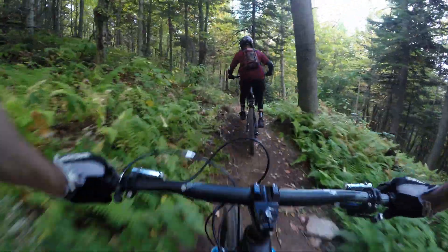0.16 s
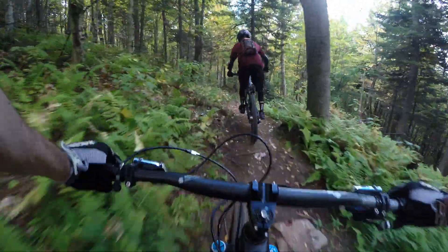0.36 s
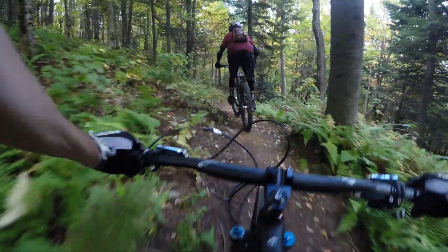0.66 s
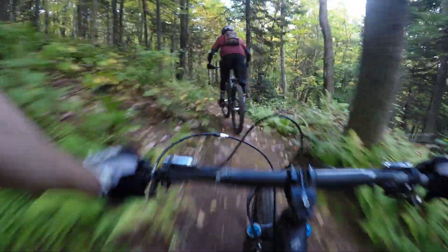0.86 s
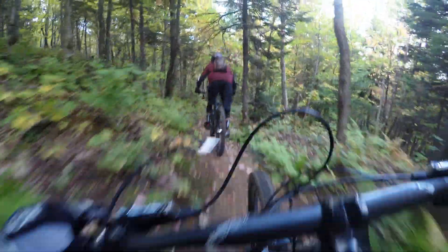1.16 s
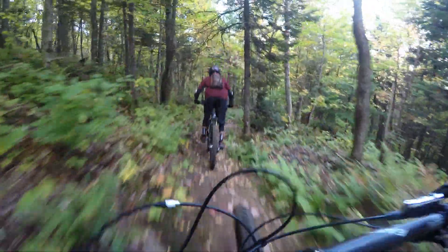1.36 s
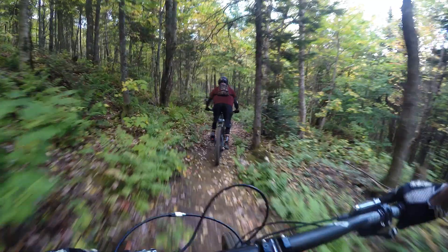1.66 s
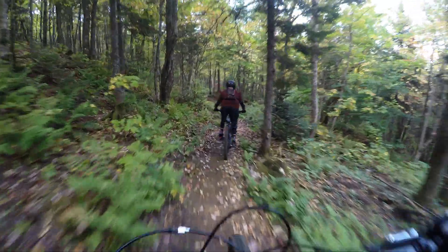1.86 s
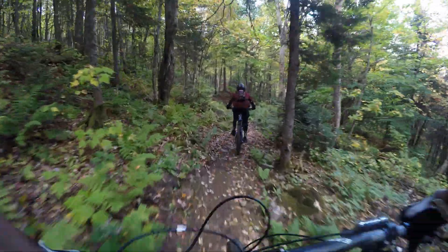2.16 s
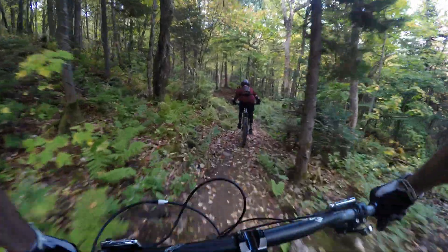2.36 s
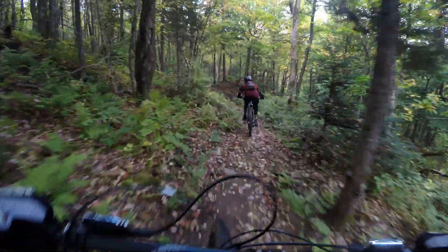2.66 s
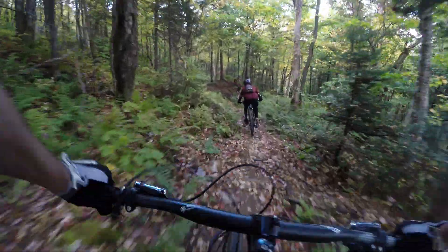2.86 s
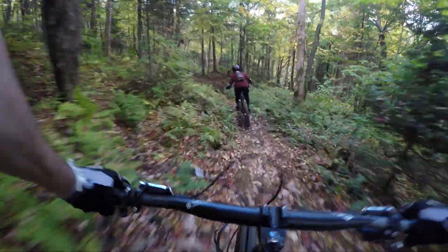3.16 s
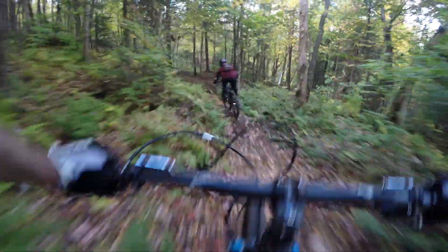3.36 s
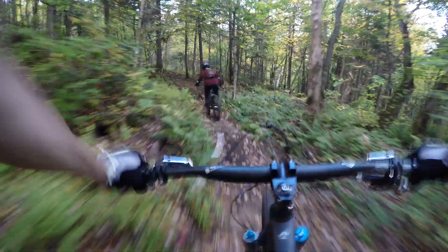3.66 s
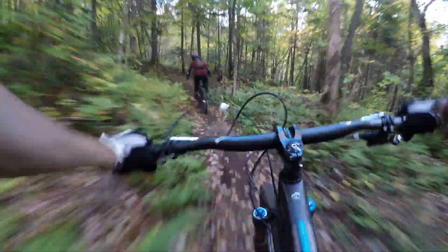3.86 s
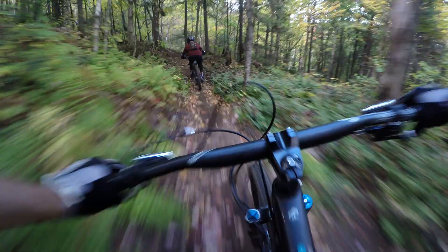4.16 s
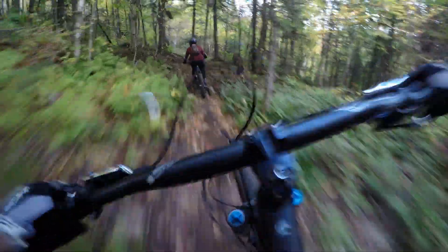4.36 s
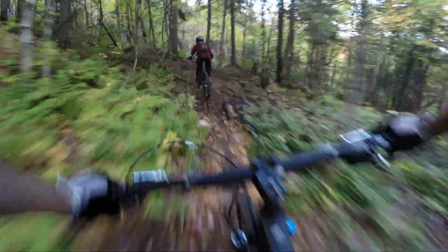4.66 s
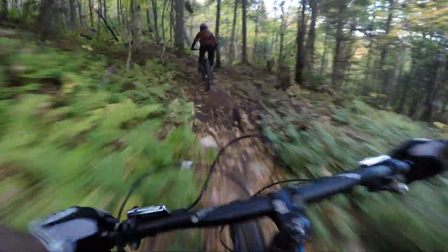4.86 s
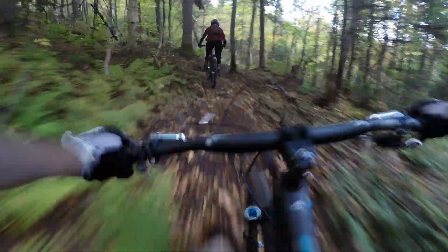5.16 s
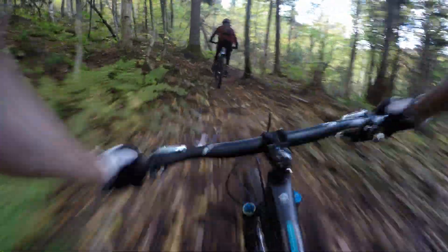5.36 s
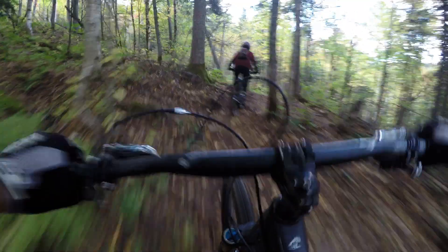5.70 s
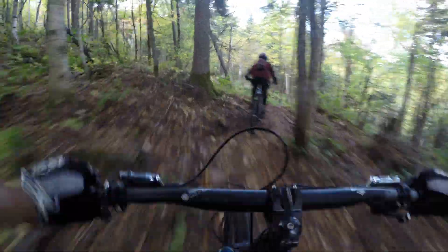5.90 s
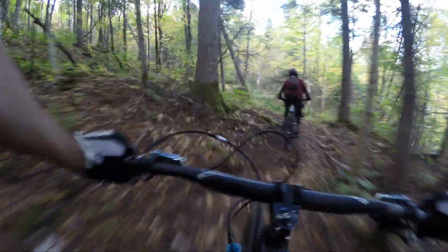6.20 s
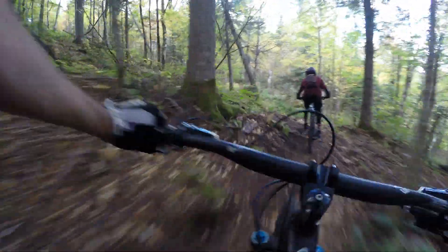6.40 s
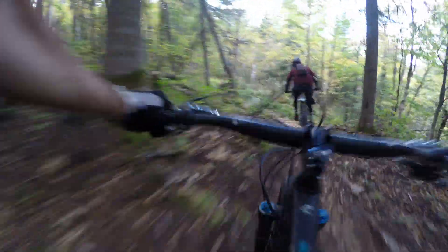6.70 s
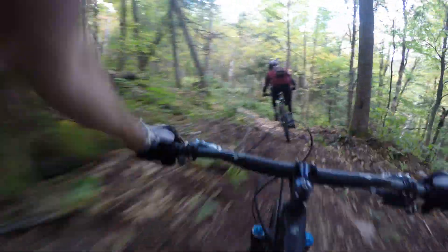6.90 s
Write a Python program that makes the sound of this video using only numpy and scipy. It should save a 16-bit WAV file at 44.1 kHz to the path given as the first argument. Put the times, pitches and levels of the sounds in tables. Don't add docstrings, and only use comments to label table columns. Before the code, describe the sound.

A mountain bike rolls down a rooty forest trail, heard dry and very close from a microphone strapped to the rider's chest. From 0 to 2.8 s it is fairly calm: deep headwind rumble, soft air thuds near 0.5, 1.3, 2.2 and 2.5 s, sparse plastic taps and tiny cable ticks over faint tyre crunch. At about 2.9 to 3.3 s a run of heavy bumps buffets and thumps the microphone. From 3.5 to 4.3 s the ride turns rough, with clustered hollow knocks, bright chain clinks, stone flicks, a short squeal near 4.07 s and loud gritty dirt and leaves. Rattling and jolts continue, thickening around 4.6 to 4.9 s. The hardest, sharpest blows land at 5.57 to 5.68 s. After 6 s gusty thuds persist to 7 s, with scattered slaps, light flicks and somewhat softer crunching.

```python
import sys
import numpy as np
from scipy import signal
from scipy.fft import rfft, irfft, next_fast_len
from scipy.io import wavfile
from scipy.ndimage import uniform_filter1d, map_coordinates

SR = 44100
rng = np.random.default_rng(int(sys.argv[2]) if len(sys.argv) > 2 else 0)


def field_ratio(decibels):
    return 10 ** (np.asarray(decibels, dtype=float) / 20)


def generate_wav(signal):
    frames = np.transpose(np.atleast_2d(signal))
    scaled = np.clip(frames, -1, 1) * 32767
    pcm = np.round(scaled).astype(np.int16)
    wavfile.write(sys.argv[1], SR, pcm)


N = 310464

# time in seconds, strength in dB.
WIND = [(0, -33.5), (.8, -27), (1.8, -25), (2.75, -21), (2.95, -14), (3.3, -17), (3.52, -25), (3.7, -13.5),
        (4.1, -14.5), (4.5, -19.5), (5.04, -23), (5.4, -15.5), (5.75, -22), (6.05, -13.5), (6.5, -22),
        (7.04, -20)]
# centre in seconds, level in dB, length in seconds.
LURCHES = [(.33, -22.5, 0.093), (.535, -12, 0.049), (.63, -17.5, 0.068), (.95, -18.5, 0.11),
           (1.24, -25, 0.043), (2.58, -13.5, 0.069), (3.1, -20, 0.12), (3.43, -11.5, 0.061),
           (3.65, -12, 0.057), (4.63, -11.5, 0.17), (4.87, -13, 0.21), (5.29, -13, 0.12), (5.88, -13, 0.13),
           (6.14, -16, 0.021), (6.24, -14.5, 0.095), (6.41, -10, 0.07), (6.63, -11, 0.069),
           (6.8, -9, 0.094), (7.02, -10.5, 0.079)]
# centre in seconds, level in dB, length in seconds,
# extra level of the finest flutter in dB.
BUMPS = [(0.5994, -21.5, 0.012, 3.5), (0.94, -26.5, 0.057, -25), (2.205, -31, 0.02, -7),
         (2.438, -19, 0.016, -17), (2.55, -19.5, 0.027, -28), (2.645, -20.5, 0.02, -25),
         (2.915, -13, 0.053, -10.5), (2.958, -8.5, 0.026, -14), (3.087, -14.5, 0.018, -13),
         (3.243, -14.5, 0.1, -14), (3.42, -15.5, 0.074, -11.5), (3.615, -17.5, 0.038, -9.5),
         (3.657, -15, 0.03, -21), (3.721, -21, 0.021, -17), (3.851, -19.5, 0.07, -3.5),
         (3.936, -16, 0.046, -20), (4.05, -20.5, 0.099, -6.5), (4.128, -11, 0.022, -7),
         (4.216, -25.5, 0.012, -2), (4.848, -17.5, 0.089, -12), (4.917, -20.5, 0.0081, 0.5),
         (5.277, -14, 0.033, -13.5), (5.58, -13.5, 0.024, -5), (5.664, -22.5, 0.05, -5),
         (6.121, -18, 0.021, -6.5), (6.225, -26, 0.062, -22), (6.371, -15.5, 0.041, -40),
         (6.422, -13.5, 0.028, -17), (6.624, -21, 0.034, -20), (7.01, -23.5, 0.064, -11),
         (0.733, -30.5, 0.015, -11), (0.623, -39, 0.051, -4), (1.081, -32, 0.023, -6),
         (2.344, -33.5, 0.022, -4), (3.028, -25, 0.076, -14), (3.127, -22, 0.021, -9.5),
         (3.17, -24.5, 0.029, -25), (5.159, -29.5, 0.035, -14), (5.365, -41, 0.039, -7),
         (5.64, -24, 0.071, -9), (6.738, -26.5, 0.073, -22)]
# frequency in Hz, level in dB per Hz.
SLOW_EDDIES = [(11, -23), (20, 3.5), (40, 3.5), (85, -7.5), (120, -16.5), (141, -23), (226, -27.5),
               (250, -26.5), (320, -57), (550, -120)]
FAST_EDDIES = [(53, -13.5), (90, 2.5), (140, -3), (255, -4), (364, -10.5), (429, -15.5), (1200, -50.5),
               (1560, -66), (2640, -120)]
SMALLEST_EDDIES = [(200, -10.5), (350, -1.5), (500, 1.5), (750, -8.5), (1200, -25), (1800, -52)]


def wind():
    heave = evened(grains(SLOW_EDDIES, rate=60, spread_db=2.5, bed=0.56), span=0.073, firmness=1.0)
    flutter = evened(grains(FAST_EDDIES, rate=300, spread_db=4.5, bed=0.41), span=0.0266, firmness=1.0)
    fine = evened(grains(SMALLEST_EDDIES, rate=690, spread_db=4.0, bed=0.48), span=0.021, firmness=0.19)
    wind_db = curves(WIND)[0]
    rough_db = curves(TRAIL)[0]

    lurch_power = swells(LURCHES, steepness=3.5, fall=1.03)
    slow = np.sqrt(field_ratio(2 * wind_db) + lurch_power) * heave

    calm_db = -38 + 0.4 * (wind_db - wind_db.mean()) + 0.97 * (rough_db - rough_db.mean())
    calm = field_ratio(calm_db + 3.1 * wobble(22))
    bump_power = swells([row[:3] for row in BUMPS], steepness=1.58, fall=1.12)
    fine_rows = [(s, db + fine_db, length) for s, db, length, fine_db in BUMPS]
    fine_power = swells(fine_rows, steepness=6.1, fall=1.12)
    return slow + np.sqrt(calm ** 2 + bump_power) * flutter + np.sqrt(fine_power) * fine


def thuds():
    out = np.zeros(N + SR)
    t = np.arange(-1500, 1500) / SR
    short_s, cycles = 0.02, 4
    for s, db, length, _ in BUMPS:
        span = min(length, short_s)
        swing = np.exp(-(t / span * 6) ** 2) * -np.cos(2 * np.pi * cycles * t / span)
        add(out, s + t[0], field_ratio(db + 1) * min(short_s / length, 1) * swing)
    return out[:N]


# start in seconds, peak level in dB, swing in milliseconds.
SHOVES = [(0.503, -9.5, 22), (1.306, -4.5, 23.4), (2.2, -3.5, 22), (2.438, -8.5, 28), (2.57, -10, 18),
          (2.641, -7.5, 23), (2.821, -6.5, 22), (3.124, -4, 26), (3.155, -5, 18), (3.269, -5.5, 19.4),
          (4.801, -14, 19), (4.913, -9.5, 9.1)]
# start in seconds, peak level in dB, swing in milliseconds.
YANKS = [
    (1.153, -12, 25),
    (2.917, -2.5, 6.4),
    (3.658, -8, 12),
    (5.575, 5.5, 3.85),
    (6.112, -7, 14),
]


def shoves():
    out = np.zeros(N + SR)
    t = np.arange(SR // 8) / SR
    slowing, settle = 0.68, 1.08
    for way, rows in ((1, SHOVES), (-1, YANKS)):
        for s, db, ms in rows:
            u = t / (ms / 1000)
            swing = np.sin(2 * np.pi * u ** slowing) * np.exp(-(u / settle) ** 2)
            add(out, s, way * field_ratio(db) * swing)
    return filtered(out[:N], lambda hz: 1 / (1 + 1j * hz / 330) ** 3)


# start in seconds, peak level in dB, swing frequency in Hz.
JOLTS = [(0.252, -23, 220), (1.346, -26, 250), (2.435, -17, 216), (2.545, -14, 323), (2.886, -15, 384),
         (2.904, -14, 456), (2.935, -12, 432), (2.956, -15, 295), (3.009, -15, 334), (3.207, -5, 224),
         (3.231, -9, 475), (3.373, -17, 404), (3.386, -10, 285), (3.4, -19, 526), (3.827, -3.5, 295),
         (3.853, -10.5, 392), (3.946, -6.5, 452), (4.192, -28, 615), (4.275, -14, 232), (4.521, -20, 172),
         (4.595, -27, 180), (4.797, -14, 402), (4.821, -14, 298), (4.833, -10, 236), (4.863, -11, 403),
         (4.871, -6.5, 512), (4.883, -7, 276), (4.976, -19, 446), (5.331, -21, 181), (5.357, -27, 426),
         (5.443, -23, 200), (5.579, -2.5, 402), (5.6552, -6, 553), (5.788, -22, 298), (6.112, -26, 417),
         (6.149, -22, 407), (6.258, -16, 164), (6.395, -18, 403), (6.476, -20, 218), (6.566, -17, 160),
         (6.727, -29, 219), (6.765, -15, 148), (6.897, -16.5, 279)]


def jolts():
    out = np.zeros(N + SR)
    t = np.arange(SR // 5) / SR
    for s, db, hz in JOLTS:
        fade = burst(t, 2.44 / hz, rise=0.29, tail=0.067)
        add(out, s, field_ratio(db - 2) * fade * rough_ring(t, hz, scatter=0.035))
    return out[:N]


# start in seconds, level in dB, length in seconds, main ring in Hz.
KNOCKS = [ (0.5952, -18.5, 0.0036, 1720), (0.7304, -24, 0.0049, 1960), (4.193, -22.5, 0.0029, 1210),
          (1.08, -26.5, 0.0038, 1540), (1.557, -25.5, 0.0065, 1370), (2.1655, -27, 0.0084, 1410),
          (3.203, -25.5, 0.0059, 1450), (3.3878, -24.5, 0.0037, 1680), (3.509, -14.5, 0.0029, 940),
          (3.533, -18, 0.0078, 810), (3.6068, -11, 0.0057, 1730), (3.706, -17.5, 0.0073, 1500),
          (3.963, -18, 0.0046, 1100), (4.025, -15.5, 0.0076, 910), (4.0365, -12.5, 0.0034, 1260),
          (4.049, -18.5, 0.0047, 1770), (4.1297, -13, 0.0023, 1780), (4.299, -16.5, 0.0072, 2170),
          (4.6267, -24.5, 0.014, 2440), (4.8487, -16.5, 0.006, 2300), (5.228, -21, 0.0049, 835),
          (5.266, -20, 0.0029, 1720), (5.389, -21, 0.0068, 1830), (5.57, -11, 0.0085, 2215),
          (5.616, -16.5, 0.0075, 1370), (5.651, -21, 0.012, 950), (5.672, -9, 0.0042, 1790),
          (6.225, -21.5, 0.0084, 837), (6.181, -24, 0.0045, 1600), (6.738, -25, 0.0079, 917), ]


def knocks():
    from_slaps = [(s, db - 14.5, 0.014, 1880) for s, db, *_ in SLAPS]
    return struck_mount(KNOCKS + from_slaps)


# start in seconds, peak level in dB, ring in Hz.
TAPS = [(0.349, -32, 890), (0.932, -27, 624), (1.489, -31.5, 930), (2.294, -24.5, 610), (2.344, -34, 600),
        (3.909, -26, 1290), (4.049, -16, 961), (4.095, -16, 649), (4.102, -27, 1010), (4.112, -15, 649),
        (4.58, -30, 1420), (5.474, -23, 915), (5.678, -20, 920), (6.041, -19.5, 590), (6.152, -19.5, 1000),
        (6.674, -19, 1270), (6.949, -21, 670)]


def taps():
    return struck_mount([(s, db - 3.5, 0.0048, hz) for s, db, hz in TAPS])


# frequency in Hz, width in Hz, level in dB.
MOUNT = [(470, 112, 2), (950, 230, 4), (1790, 370, 2), (2810, 500, 0.5), (4900, 2000, -5.5)]


def struck_mount(blows):
    ring, rattle = np.zeros(N + SR), np.zeros(N + SR)
    t = np.arange(SR // 12) / SR
    for s, db, length, hz in blows:
        snap = field_ratio(db + 11.5) * np.exp(-((t - .0008) / 0.000095) ** 2) * (0.0016 / length)
        ring_fade = field_ratio(db + 2.0) * burst(t, 0.67 * length, rise=0.4, tail=0.076)
        add(ring, s, ring_fade * rough_ring(t, hz, scatter=0.06))
        rattle_fade = field_ratio(db) * burst(t, 0.78 * length, rise=0.76, tail=0.15)
        add(rattle, s, snap + rattle_fade * rng.standard_normal(len(t)))
    struck = ring[:N] + field_ratio(8.5) * filtered(rattle[:N], resonances(MOUNT))
    return filtered(struck, lambda hz: 1 / (1 + 1j * hz / 5500) ** 2)


# start in seconds, level in dB, length in milliseconds, ring in Hz.
SLAPS = [(0.056, -31.5, 5, 4670), (0.362, -31, 3.5, 8170), (0.373, -29, 2.4, 4370),
         (0.446, -33.5, 8.2, 3000), (0.595, -30.5, 3.5, 5700), (.86, -45, 4, 4840),
         (0.936, -31.5, 2.6, 3360), (0.948, -29.5, 3.2, 3060), (0.9976, -29, 4.6, 3530),
         (1.562, -35, 2.3, 4100), (3.993, -22.5, 2.7, 3930), (1.679, -31, 5.4, 4080),
         (2.592, -30.5, 5.7, 5100), (2.896, -29.5, 2.4, 4000), (3.534, -28, 4.1, 4830),
         (3.908, -20, 2.3, 5500), (3.955, -30, 21, 4550), (4.3004, -24, 6.5, 4840), (5.059, -27, 2.3, 3900),
         (5.267, -25, 3.4, 5700), (5.367, -25.5, 4.2, 3540), (5.411, -17.5, 2.3, 3850),
         (5.474, -23.5, 3.5, 4730), (5.927, -21.5, 1.6, 6440), (5.995, -14.5, 0.76, 3650),
         (6.042, -26, 5, 4350), (6.213, -21, 3, 5220), (6.329, -25, 6.1, 5020), (6.7336, -22, 2.8, 4920),
         (6.94, -25, 2.3, 5070)]
# start in seconds, level in dB, length in milliseconds, ring in Hz.
CLINKS = [(1.197, -31.5, 5.5, 3520), (1.3795, -29.5, 2.3, 3880), (1.919, -28, 4.3, 3750),
          (2.018, -30.5, 7.2, 3570), (3.252, -24, 5.3, 5900), (3.327, -26.5, 3.2, 3620),
          (3.6073, -16, 3.3, 2980), (3.713, -17.5, 8, 4500), (3.794, -26.5, 7.5, 3170),
          (3.869, -19.5, 4.4, 3880), (4.022, -22, 3.5, 3500), (4.0825, -12.5, 1.3, 5680),
          (4.0947, -12.5, 1.9, 5650), (4.376, -27.5, 8.5, 3640), (4.511, -22, 1.9, 3530),
          (4.573, -26.5, 7.3, 3380), (4.616, -23, 5.4, 3510), (4.626, -15.5, 3.3, 3420),
          (4.697, -24.5, 3.9, 3330), (4.766, -18.5, 2.1, 3160), (5.1797, -23.5, 6.6, 3530),
          (5.5105, -24.5, 4, 3440), (5.57, -15.5, 6.3, 3280), (5.673, -13, 1, 3180),
          (5.868, -23.5, 9.2, 3470), (5.913, -23, 3.4, 4250), (6.086, -24, 4.5, 3250),
          (6.131, -18.5, 3.1, 5100), (6.68, -26, 20, 5070), (6.834, -23, 2.5, 3360)]


def slaps_and_clinks():
    ring, cracks = np.zeros(N + SR), np.zeros(N + SR)
    t = np.arange(SR // 12) / SR
    ticks = [(*row, -5.5) for row in SLAPS]
    ticks += [(*row, -11 - 0.18 * (row[1] + 23)) for row in CLINKS]
    for s, db, ms, hz, sizzle_db in ticks:
        fade = field_ratio(db) * burst(t, 1.03 * ms / 1000, rise=0.35, tail=0.058)
        add(ring, s, field_ratio(1.5) * fade * rough_ring(t, hz, scatter=0.33))
        add(cracks, s, field_ratio(sizzle_db + 5.5) * fade * rng.standard_normal(len(t)))
    bright = colour([(1500, 11.5), (3500, 1.0), (6000, 1.5), (13000, -2.5), (17000, -21)])
    body = colour([(1200, -5), (2800, 4.5), (7000, -4.5), (11000, -11)])
    return filtered(ring[:N], body) + filtered(cracks[:N], bright)


# start in seconds, length in seconds, level in dB.
SCRAPES = [
    (3.675, .04, -35),
    (3.745, .013, -31),
    (3.761, .024, -30),
    (3.822, .03, -39),
    (4.475, .03, -37),
    (5.35, .02, -34),
    (5.878, .028, -32),
    (6.685, .045, -32),
    (6.93, .04, -43),
]
# frequency in Hz, width in Hz, level in dB.
STEEL = [(3200, 500, -2), (5050, 450, 0), (6400, 500, -6), (7750, 600, -4.5), (9700, 900, -8)]


def scrapes():
    rub = np.zeros(N + SR)
    t = np.arange(SR // 12) / SR
    for s, length, db in SCRAPES:
        add(rub, s, field_ratio(db) * np.abs(np.sin(np.pi * np.clip(t / length, 0, 1))) ** 0.58)
    uneven = field_ratio(3 * wobble(300)) * rng.standard_normal(N)
    hiss = unit(filtered(uneven, lambda f: resonances(STEEL)(f) ** 2))
    return rub[:N] * hiss


# start in seconds, length in seconds, level in dB, first pitch in Hz, last pitch in Hz.
SQUEALS = [
    (4.071, 0.022, -24.5, 2190, 2210),
    (4.07, 0.022, -25.5, 2670, 2670),
    (1.355, 0.045, -41, 1360, 1410),
    (3.761, 0.027, -28, 5300, 4950),
    (5.879, 0.023, -25.5, 5100, 4310),
    (6.693, 0.038, -39, 5220, 4900),
]


def squeals():
    out = np.zeros(N + SR)
    t = np.arange(SR // 12) / SR
    for s, length, db, first_hz, last_hz in SQUEALS:
        gone = np.clip(t / length, 0, 1)
        phase = 2 * np.pi * np.cumsum(first_hz + (last_hz - first_hz) * gone) / SR
        jitter = 0.11 * np.cumsum(rng.standard_normal(len(t)))
        add(out, s, field_ratio(db) * np.abs(np.sin(np.pi * gone)) ** 0.65 * np.sin(phase + jitter))
    return out[:N]


# start in seconds, peak level in dB, ring in Hz.
FLICKS = [(0.0306, -25, 3420), (0.5316, -22.5, 3080), (0.9862, -32, 3500), (1.361, -28, 4100),
          (2.7267, -22, 3430), (3.0112, -18, 2960), (3.499, -19, 5030), (3.5334, -14, 3150),
          (3.5964, -20, 3030), (3.6506, -31, 4990), (3.8496, -22, 3370), (3.908, -20, 5430),
          (3.9394, -25, 4100), (3.959, -13, 3370), (4.0167, -12.5, 3370), (4.0493, -21, 4200),
          (4.1604, -21, 3670), (4.4475, -21, 3900), (4.5431, -14.5, 4180), (4.616, -14, 3720),
          (4.7514, -21, 3300), (5.1023, -19, 4420), (5.15, -19, 4280), (5.201, -13.5, 3270),
          (5.231, -18, 4680), (5.4108, -14, 4520), (5.7503, -21, 4100), (5.7886, -21, 4000),
          (5.7994, -29, 3100), (5.8823, -12, 4900), (5.937, -21, 3150), (5.9941, -13.5, 3220),
          (6.158, -21, 3100), (6.1938, -17, 4100), (6.265, -18, 3300), (6.2916, -21.5, 3800),
          (6.4065, -16, 4300), (6.5171, -26, 3120), (6.549, -26, 3020), (6.803, -22, 3750),
          (6.9104, -19, 4590), (6.949, -15.5, 5000), (6.957, -22, 5320), (6.991, -28, 3620),
          (7.0034, -27, 4170)]
# frequency in Hz, level in dB per Hz.
FLICK_TONE = [(1200, -14), (2500, 3), (5000, -8), (10000, -5), (15000, -18), (17000, -25)]


def flicks():
    ring, cracks = np.zeros(N + SR), np.zeros(N + SR)
    t = np.arange(SR // 30) / SR
    for s, db, hz in FLICKS:
        fade = field_ratio(db) * burst(t, 0.0041, rise=0.12, tail=0.06)
        add(ring, s, field_ratio(-9) * fade * rough_ring(t, hz, scatter=0.46))
        add(cracks, s, field_ratio(-10.5) * fade * rng.standard_normal(len(t)))
    return ring[:N] + filtered(cracks[:N], colour(FLICK_TONE))


# start in seconds, peak level in dB.
PEBBLES = [(0.001, -33), (0.281, -45), (0.395, -29), (3.794, -13), (3.9085, -22), (3.7165, -13),
           (4.0835, -19), (4.096, -19), (5.4122, -13), (5.678, -28), (5.995, -13)]


def pebbles():
    out = np.zeros(N + SR)
    t = np.arange(SR // 50) / SR
    for s, db in PEBBLES:
        add(out, s, field_ratio(db) * burst(t, 0.00099, rise=0.11, tail=0.089) * rng.standard_normal(len(t)))

    def thin(hz):
        u = 1j * hz / 2600
        return (u / (1 + u)) ** 2 / (1 + 1j * hz / 7000)
    return filtered(out[:N], thin)


# time in seconds, roughness in dB, leaf cover in dB.
TRAIL = [(0, -45.5, -10), (.9, -45.5, -9), (1.41, -47, -8.5), (2.63, -45, -4.5), (2.82, -40, -0.5),
         (3.2, -43, -9), (3.69, -35, -4), (3.92, -33.5, -11), (4.12, -29, -10.5), (4.33, -37.5, -6),
         (4.92, -33, -9), (5.25, -40, -5.5), (5.37, -34.5, -7.5), (5.65, -39.5, -5.5), (6.12, -37.5, -4.5),
         (6.41, -41.5, -5), (6.88, -40.5, -14.5), (7.04, -36.5, -11)]
# centre in seconds, level in dB, length in seconds.
PATCHES = [(0.176, -44, 0.082), (0.37, -52, 0.021), (0.614, -49, 0.069), (0.868, -43.5, 0.033),
           (0.948, -44, 0.021), (1.001, -48, 0.038), (1.379, -45, 0.025), (1.818, -48.5, 0.026),
           (2.035, -49.5, 0.027), (2.407, -43, 0.038), (2.596, -42, 0.047), (2.904, -39, 0.029),
           (3.272, -41.5, 0.18), (3.525, -39, 0.035), (3.962, -30.5, 0.037), (4.09, -32, 0.048),
           (4.582, -32.5, 0.0056), (4.627, -43, 0.021), (4.765, -33, 0.038), (4.86, -37.5, 0.15),
           (5.03, -34, 0.024), (5.17, -35.5, 0.039), (5.263, -34.5, 0.062), (5.577, -37, 0.045),
           (5.793, -37.5, 0.046), (3.13, -41.5, 0.036), (0.1, -50, 0.05), (6.2, -35, 0.019),
           (6.336, -43, 0.011), (6.72, -48, 0.19), (6.949, -44.5, 0.1)]
# frequency in Hz, level in dB per Hz.
DIRT = [(180, -60), (300, 4), (396, 2), (611, -0.5), (725, -7.5), (1380, -5.5), (2310, -12), (4240, -19),
        (7000, -31.5), (9100, -42), (15400, -120)]
GRIT = [(1470, -85), (2500, -3), (5030, -4.5), (6700, -6.5), (13100, -11), (15000, -18.5), (16000, -38)]
# frequency in Hz, width in Hz, level in dB.
CRUNCH_PEAK = [(952, 120, -7.5)]


def tyres():
    dirt_db, cover_db = curves(TRAIL)
    grit_db = dirt_db + cover_db
    clumps = wobble(45)
    loose = swells(PATCHES, steepness=2.6, fall=0.98)

    stones = crunch(DIRT, rate=1200, low_hz=445, high_hz=5884, cycles=7, spread_db=2.9, bed=1.0)
    peaked = filtered(stones, lambda f: 1 + resonances(CRUNCH_PEAK)(f))
    dirt = unit(field_ratio(1.7 * clumps + 0.7 * wobble(14)) * peaked)
    dirt_power = field_ratio(2 * (dirt_db + 0.5)) + field_ratio(7.5) * loose

    leaves = crunch(GRIT, rate=1700, low_hz=2470, high_hz=15400, cycles=6, spread_db=2.6, bed=1.4)
    grit = unit(field_ratio(1.4 * clumps + 0.7 * wobble(90)) * leaves)
    grit_power = field_ratio(2 * (grit_db - 2.5)) + field_ratio(-3.5) * loose

    snaps = field_ratio(grit_db - 4) * twigs(rate=49, length_s=0.0017)
    return np.sqrt(dirt_power) * dirt + np.sqrt(grit_power) * grit + snaps


def crunch(spectrum, rate, low_hz, high_hz, cycles, spread_db, bed):
    when, pitch, size, life = rng.random((12000, 4)).T
    keep = np.arange(len(when)) < rate * N / SR
    hz = (low_hz * (high_hz / low_hz) ** pitch)[keep, None]
    gain = field_ratio(spread_db * np.minimum(-np.log(size), 3.2))[keep, None]
    k = np.arange(300)
    turns = hz * k / SR
    fade = np.exp(-turns / (cycles * (0.29 + life[keep, None]))) * (1 - k / len(k))
    rings = gain * np.sqrt(hz) * np.sin(2 * np.pi * turns) * fade
    at = (when[keep, None] * N).astype(int) + k
    summed = np.bincount(at.ravel(), rings.ravel(), N + len(k))[:N]
    whitened = filtered(summed, lambda f: f)
    return unit(filtered(unit(whitened) + bed * rng.standard_normal(N), colour(spectrum)))


def twigs(rate, length_s):
    t = np.arange(400) / SR
    hits = (rng.random(N) < rate / SR) * field_ratio(2.6 * rng.standard_normal(N))
    gate = np.convolve(hits, t * np.exp(-t / length_s))[:N]
    return unit(filtered(gate * rng.standard_normal(N), colour(GRIT)))


def grains(spectrum, rate, spread_db, bed):
    chance, size, noise = rng.random(N), rng.exponential(size=N), rng.standard_normal(N)
    pushes = (chance < rate / SR) * np.sign(noise) * field_ratio(spread_db * np.minimum(size, 3.5))
    return unit(filtered(unit(pushes) + bed * rng.standard_normal(N), colour(spectrum)))


def evened(x, span, firmness):
    level = np.sqrt(np.abs(uniform_filter1d(x ** 2, int(span * SR))) + 0.018)
    return unit(x / level ** firmness)


def swells(rows, steepness, fall):
    power, t = np.zeros(N), np.arange(N) / SR
    for s, db, length in rows:
        first = max(round((s - 2 * length) * SR), 0)
        near = slice(first, round((s + 2 * fall * length) * SR))
        late = (t[near] - s) / (0.41 * length)
        away = np.where(late > 0, late / fall, -late * fall)
        power[near] += field_ratio(2 * db) * np.exp(-away ** steepness)
    return power


def burst(t, length, rise, tail):
    build = 1 - np.exp(-(t / (rise * length)) ** 2)
    return build * (np.exp(-(t / length) ** 1.28) + tail * np.exp(-t / (6.8 * length)))


def rough_ring(t, hz, scatter):
    return np.sin(2 * np.pi * hz * t + scatter * np.cumsum(rng.standard_normal(len(t))))


def unit(x):
    return x / np.sqrt(np.mean(x ** 2) + 1e-20)


def curves(rows):
    s, *cols = np.transpose(rows)
    return [np.interp(np.arange(N) / SR, s, c) for c in cols]


def wobble(rate):
    return map_coordinates(rng.standard_normal(int(N * rate / SR) + 4), [np.arange(N) * rate / SR])


def filtered(x, response):
    m = next_fast_len(N + SR // 2)
    return irfft(rfft(x, m) * response(np.fft.rfftfreq(m, 1 / SR)), m)[:N]


def colour(points):
    hz, db = np.transpose(points)
    return lambda f: field_ratio(np.interp(np.log(f + 1), np.log(hz + 1), db, -120, -120))


def resonances(modes):
    def response(f):
        total = 0
        for k, (centre, width, db) in enumerate(modes):
            damping = 1j * f * width
            total = total + (-1) ** k * field_ratio(db) * damping / (centre * centre - f * f + damping)
        return total
    return response


def add(track, s, sound):
    track[round(s * SR):][:len(sound)] += sound


def scene():
    shaken = wind() + thuds() + shoves() + jolts()
    bike = knocks() + taps() + slaps_and_clinks() + scrapes() + squeals()
    ground = flicks() + pebbles() + tyres()
    return (shaken + bike + ground)[None]


def roll_off(x):
    return signal.sosfilt(signal.butter(12, 16480, fs=SR, output="sos"), x)


def record(dry):
    soft = dry / (1 + np.abs(dry / .97) ** 4) ** (1 / 4)
    dulled = filtered(soft[0], lambda hz: 1 / (1 + (hz / 15600) ** 110))[None]
    return roll_off(dulled)


dry = scene()
out = record(dry)
generate_wav(out)
```